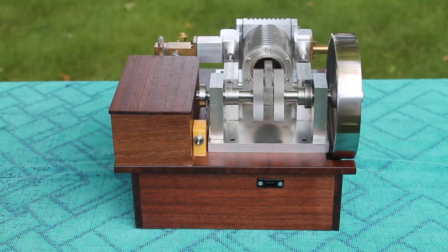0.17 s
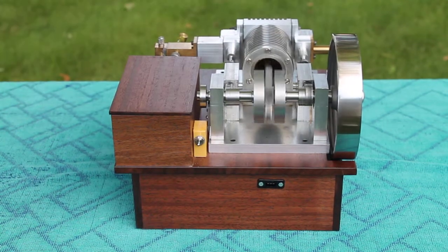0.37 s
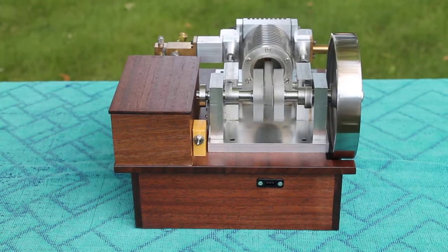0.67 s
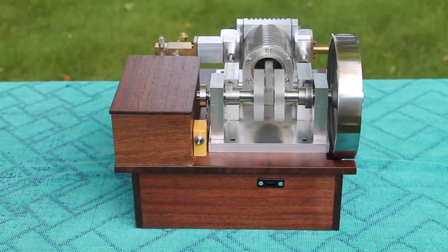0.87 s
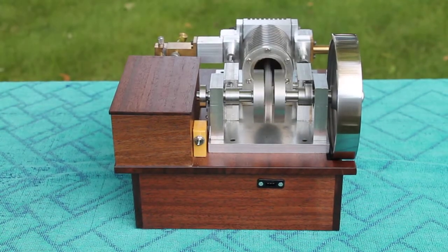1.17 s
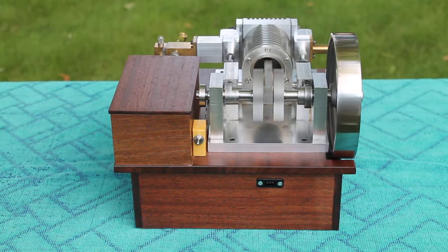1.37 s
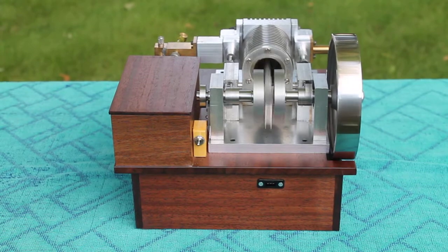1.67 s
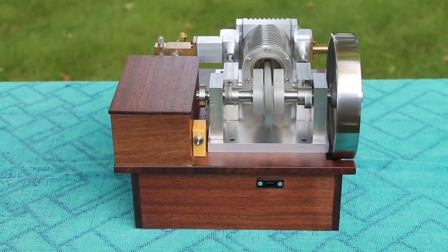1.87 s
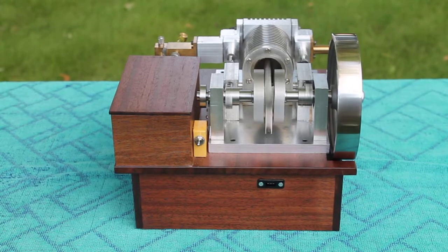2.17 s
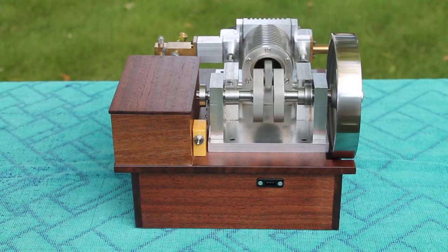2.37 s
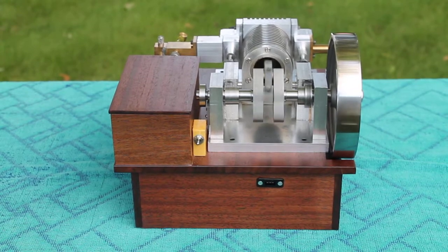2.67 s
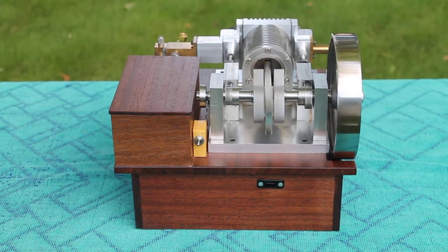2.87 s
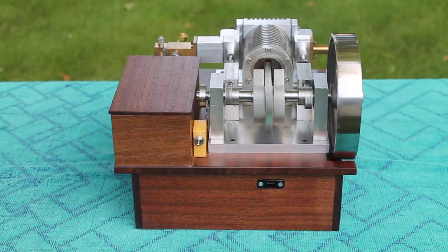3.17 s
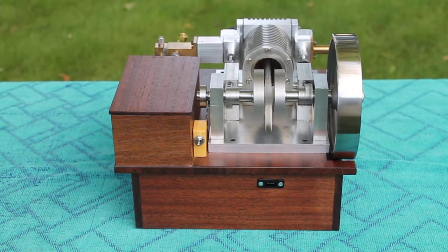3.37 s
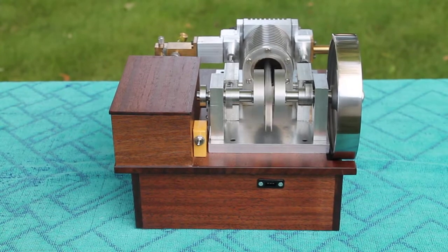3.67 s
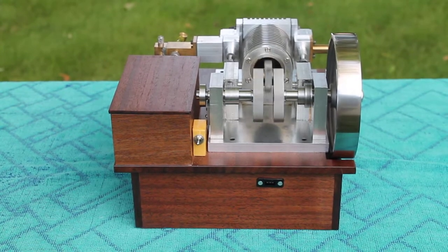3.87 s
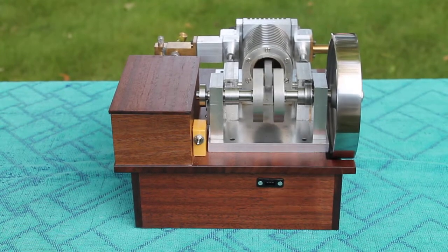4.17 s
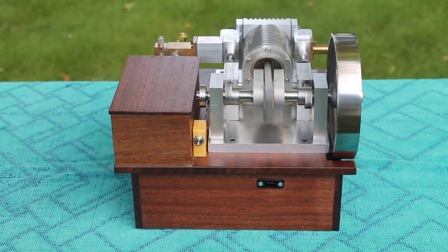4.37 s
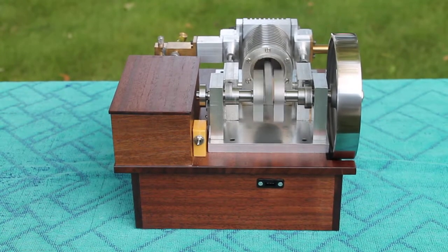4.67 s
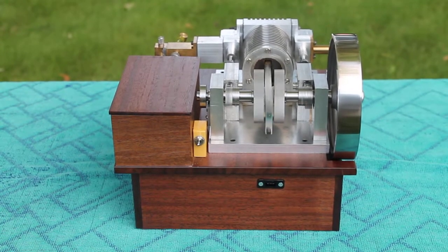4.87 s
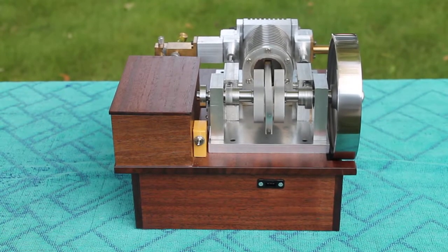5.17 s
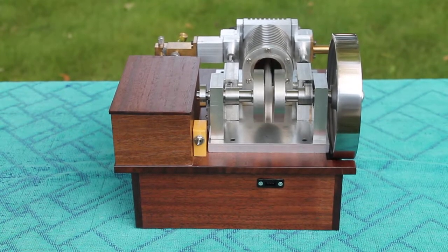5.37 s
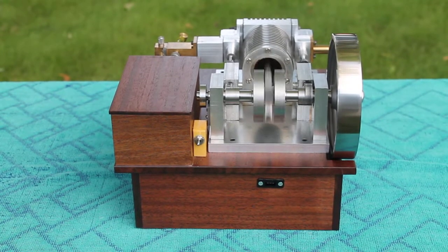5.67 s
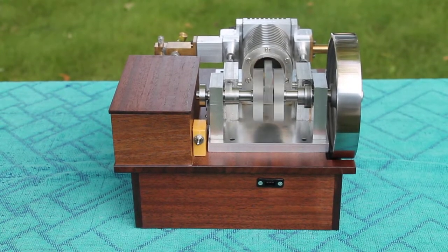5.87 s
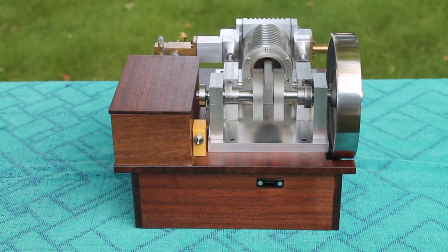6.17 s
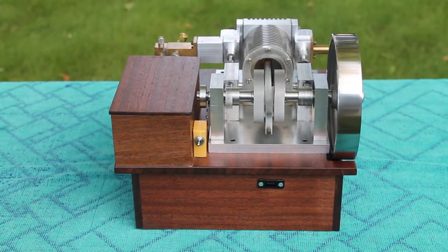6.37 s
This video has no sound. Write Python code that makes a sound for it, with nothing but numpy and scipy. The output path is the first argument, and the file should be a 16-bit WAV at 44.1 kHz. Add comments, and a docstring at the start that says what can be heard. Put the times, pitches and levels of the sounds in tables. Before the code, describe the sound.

Close, dry outdoor sound of a little metal engine on a wooden box. Each turn gives a sharp snappy exhaust pop, a short hollow hoot and puff of gas, then a bright metallic clack and a lighter tick. It catches unevenly at first, slightly faster and with one big hissing puff, then keeps a limping loud-soft rhythm to the end, over soft mechanical rubbing and faint still air.

```python
"""A small single-cylinder model gas engine barks through its exhaust outdoors, unevenly, about seven turns a second.
Each blast is a damped port resonance with noise bursts; the cylinder then hoots as a gliding sine while gas hisses out.
Valve gear, inlet and ignition add noise bursts and decaying modes; sliding parts rub as modulated noise.
A wall and the garden answer faintly by convolution with decaying noise, over a still-air noise floor."""
import sys
import numpy as np
from scipy import signal
from scipy.fft import rfft, irfft, next_fast_len
from scipy.io import wavfile

SR = 44100
rng = np.random.default_rng(int(sys.argv[2]) if len(sys.argv) > 2 else 0)


def output_pcm(signal):
    """Save a mono or channel-first signal as 16-bit PCM at the path in sys.argv[1].

    Samples are clipped to [-1, 1] before scaling.
    """
    pcm = np.clip(np.atleast_2d(signal).T, -1, 1) * 32767
    wavfile.write(sys.argv[1], SR, np.round(pcm).astype(np.int16))


N = 287973

# Exhaust openings, one a turn; once settled, hard and soft blasts alternate: start_s, cylinder_pressure_db
EXHAUST_OPENINGS = [(0.1115, -7), (0.2718, 8.5), (0.3847, 4), (0.5034, 6), (0.6224, -3.5), (0.7524, 7),
                    (0.8543, -0.5), (0.965, 7.5), (1.068, -1.5), (1.1848, -3), (1.319, -4), (1.452, -11),
                    (1.5515, -4), (1.6756, 7), (1.7925, -3), (1.9196, 5.5), (2.0485, 2), (2.1857, 4),
                    (2.3226, -1), (2.468, 3.5), (2.6166, 0), (2.764, 2), (2.9085, -3.5), (3.0619, 4.5),
                    (3.2119, -6), (3.3711, 2.5), (3.5217, -8), (3.6733, 4), (3.8185, -4.5), (3.9695, 2.5),
                    (4.1218, -1.5), (4.2803, 2.5), (4.4288, -5), (4.5847, 4), (4.7418, -3.5), (4.9022, 3.5),
                    (5.0508, -7), (5.2092, 1.5), (5.3593, 0), (5.51, 3.5), (5.6571, -4), (5.8078, 4.5),
                    (5.9536, -7), (6.1051, 5), (6.2478, -5.5), (6.396, -2.5)]
# What the cylinder pressure drives: pressure_db, bark_db, jet_db, hoot_db, outflow_db
PRESSURE_LAWS = [(-11, -45, -37, -27, -69), (-7.5, -24.5, -24, -34.5, -84), (-5.5, -21, -27, -30.5, -55.5),
                 (2.5, -16.5, -14.5, -28.5, -45), (5, -14.5, -15, -28.5, -39.5),
                 (7.5, -14.5, -13, -25.5, -31.5)]

# Noise spectra, relative density against frequency: frequency_hz, density_db (per Hz)
BARK_SPECTRUM = [(300, -7.5), (450, -3.5), (750, -5.5), (1150, -9.5), (1700, 2.5), (2200, -2), (2700, -6),
                 (3500, -5.5), (4000, -21)]
JET_SPECTRUM = [(4000, -4), (5000, 2.5), (6500, 1), (7800, 3.5), (9500, -0.5), (11000, -5), (12500, -3.5),
                (14500, -5), (16000, 0.5)]
# Heavy first gush of burnt gas: frequency_hz, density_db
CHUFF_SPECTRUM = [(120, -9), (350, -2.5), (1000, 8), (3000, -22), (16000, -50)]
# Hiss of the burnt gas flowing out: frequency_hz, density_db
OUTFLOW_SPECTRUM = [(100, -9.5), (400, 11.5), (600, -35), (1000, -18), (1800, -6), (2800, -9.5),
                    (4300, -9.5), (5600, -3), (8000, -5), (10500, -12.5), (13000, -12), (16000, -32)]
# Valve clack: frequency_hz, density_db
CLACK_SPECTRUM = [(150, -11), (450, -2.5), (700, -7), (1000, -1.5), (1500, 5), (2600, 7), (3700, 2),
                  (4600, 3.6), (5500, -6.5), (7000, -7.5), (8200, 2), (10500, -10), (14000, -29.5),
                  (16000, -51)]
# Inlet shutting: frequency_hz, density_db
TICK_SPECTRUM = [(120, -64), (350, 3), (650, -5), (1100, -16.5), (1700, -6.5), (3100, -7), (4000, -16.5),
                 (5500, -19.5), (7000, -14), (8400, -10.5), (10500, -23), (14000, -20.5), (16000, -33)]
# Gas drawn in: frequency_hz, density_db
DRAW_SPECTRUM = [(1500, 8), (2900, 0), (3900, -31), (4800, 12), (5800, -6.5), (7000, 10.5), (8000, -24),
                 (9300, 6.5), (13000, -0.5), (16000, 0.5)]
# Rubbing piston and bearings: frequency_hz, density_db
SLIDE_SPECTRUM = [(60, -71), (150, 12), (400, -12), (600, -9.5), (1100, 2), (1800, -1), (2900, 7.5),
                  (3800, -1), (4700, 0.5), (6000, -7.5), (8500, -16.5), (11000, -25), (16000, -56)]
# Still garden air: frequency_hz, density_db
AIR_SPECTRUM = [(60, -5), (150, 13.5), (3000, 0.5), (16000, -47)]

# Modes of the valve gear: frequency_hz, level_db, t60_s
GEAR_MODES = [(474, -12, 0.047), (1062, -9.5, 0.034), (1565, -5, 0.047), (2606, -4, 0.026),
              (3820, 2, 0.016), (4594, -1, 0.029), (8066, 11, 0.008)]
# Modes of the exhaust tappet: frequency_hz, level_db, t60_s
TAPPET_MODES = [(2480, 14.5, 0.0097), (2980, -8, 0.037), (12700, -51, 0.022), (14400, -17, 0.018)]
# Modes of the engine frame on its wooden box: frequency_hz, level_db, t60_s
FRAME_MODES = [(511, -1.5, 0.043), (653, 0.5, 0.045), (995, 4, 0.036), (1520, -3.5, 0.038),
               (1817, 2, 0.026), (3080, 3, 0.015)]

# Air resonance of the cylinder as the piston rises: stroke_share (0 to 1), pitch_hz, level_db
HOOT_GLIDE = [(0, 176, 2), (.12, 200, 2.5), (.24, 232, -2), (.34, 278, -9.5), (.52, 365, -25),
              (1, 420, -40)]
# Slow swelling and fading of the hoot: time_s, level_db
HOOT_SWELL = [(0.1, 0.5), (0.75, 2), (1.2, -2), (2.0, 1), (2.7, 2), (3.2, -0.4), (6.4, -0.6)]
# Bark pitch of a hard blast: time_s, pitch_hz
HARD_BARK_PITCH = [(0.4, 1770), (2.0, 1784), (3.2, 1623), (5.2, 1703), (5.8, 1680)]
# Rubbing level before stroke, grain and trim: time_s, level_db
SLIDING_LEVEL = [(0.0, -44), (0.44, -43.5), (3.47, -47), (6.53, -48.5)]
# Reverberation time of the garden: frequency_hz, t60_s
GARDEN_DECAY = [(200, 0.15), (4000, 0.38), (15000, 0.69)]
# Flywheel lurches while the engine catches: turn_start_s, clack_delay_s (negative is early)
FLYWHEEL_LURCHES = [(0.11, 0.0046), (0.62, 0.0046), (1.32, 0.0098), (1.45, -0.0057)]
# Strength of combustion, harder in the first charges: time_s, level_db
FLAME_LEVEL = [(1.66, -23), (1.89, -28)]
# Charges that do not light: time_s
MISFIRE_TIMES = [0.08, 0.6, 0.83, 1.05, 1.16, 1.29, 1.53, 1.77, 2.02]
# Charges that light late: time_s
LATE_FLAME_TIMES = [0.36, 1.65, 3.94]

TOP_HZ = 16050  # band limit
LEAD = 1024  # samples before each event's time zero
T = (np.arange(8 * LEAD) - LEAD) / SR  # time around one event (s)
AFTER = np.maximum(T, 0)
TURN_S = 0.148  # usual turn
# return stroke in a usual turn, its power law against the turn, and the time each dB of pressure saves
RETURN_S, RETURN_POWER, PUSH_S_PER_DB = 0.0734, 1.06, 0.00007
# the inlet stays open for a lag plus a share of the return stroke
INLET_LAG_S, INLET_SHARE = 0.0022, 0.39
# from the inlet shutting to ignition, the extra wait of a slow charge, and the spread in strength
FLAME_DELAY_S, LATE_DELAY_S, FLAME_SCATTER_DB = 0.0103, 0.0063, 1.1
# one late charge burns on into the open exhaust and swells its outflow
AFTERBURN_S, AFTERBURN_DB = 1.45, 31
# a soft blast barks higher: its pitch, the pressure where this changes, and the width of the change
SOFT_BARK_HZ, BARK_SWITCH_DB, BARK_BLEND_DB = 2720, -1.5, 3


def amp(db):
    """Decibel law: level to amplitude ratio."""
    return 10 ** (np.asarray(db) / 20)


def along(points, hz):
    """Linear interpolation of (frequency_hz, value) points on a logarithmic frequency axis."""
    f, value = np.transpose(points)
    return np.interp(np.log(hz + 1), np.log(f + 1), value)


def columns(rows):
    """Table columns set upright, one row per event, to broadcast against event time."""
    return np.transpose(rows)[:, :, None]


def filtered(x, response):
    """Linear filtering: multiplication by a frequency response."""
    size = x.shape[-1]
    padded = next_fast_len(size + LEAD)
    spectrum = rfft(x, padded) * response(np.fft.rfftfreq(padded, 1 / SR))
    return irfft(spectrum, padded)[..., :size]


def noise(spectrum, shape):
    """Spectral shaping of white noise to rms 1, with a roll-off below the lowest listed frequency."""
    def response(f):
        skirt = 1 / (1 + (spectrum[0][0] / 2 / (f + 1)) ** 4)
        return amp(along(spectrum, f)) * skirt

    x = filtered(rng.standard_normal(shape), response)
    return x / x.std()


def sized(x):
    """Energy normalization: each burst gets the energy of rms 1 held for 6 ms."""
    energy = np.sum(x ** 2, axis=-1, keepdims=True)
    return x / np.sqrt(energy / (.006 * SR) + 1e-20)


def burst(spectrum, count, onset, rise, decay):
    """Transient turbulence: noise breaks out near -onset, swells to time zero and dies away (all s)."""
    start = onset * np.exp(0.274 * rng.standard_normal((count, 1)))
    attack = np.clip((T + start) / 0.00022, 0, 1)
    envelope = attack * np.exp(np.minimum(T, 0) / rise - AFTER / decay)
    return sized(noise(spectrum, (count, len(T))) * envelope)


def ringing(modes, count):
    """Modal superposition: each blow excites every damped mode at a new strength and phase."""
    out = 0
    for hz, db, t60 in modes:
        strength, phase = rng.standard_normal((2, count, 1))
        decay = amp(db + 1.06 * strength - 60 * AFTER / t60)
        out = out + decay * np.sin(2 * np.pi * (hz * T + phase))
    return sized(out * (1 - np.exp(-AFTER / 0.00014)))


def placed(times, sounds):
    """Linear superposition of event sounds on the time line."""
    at = np.round(times * SR).astype(int) + np.arange(len(T))
    return np.bincount(np.maximum(at, 0).ravel(), sounds.ravel(), N + LEAD)[LEAD:LEAD + N]


def near(times, moments):
    """Coincidence test: which times lie within 45 ms of one of the moments."""
    return np.any(abs(times - np.atleast_1d(moments)) < .045, axis=1, keepdims=True)


def intake_times():
    """Crank kinematics: the inlet opens about half a turn after each exhaust and then shuts: (opens s, shuts s)."""
    s, pressure_db = columns(EXHAUST_OPENINGS)
    start = np.vstack([s[0] - TURN_S, s])
    turn = np.vstack([s, s[-1] + TURN_S]) - start
    stroke = RETURN_S * (turn / TURN_S) ** RETURN_POWER
    stroke = stroke - PUSH_S_PER_DB * np.vstack([0, pressure_db])
    stroke = stroke + sum(delay * near(start, at) for at, delay in FLYWHEEL_LURCHES)
    opens = start + stroke
    return opens, opens + INLET_LAG_S + INLET_SHARE * stroke


def pace_db():
    """Stroke speed as a level: each intake's quickness relative to the median, in dB."""
    s, shut = intake_times()
    return 20 * np.log10(np.median(shut - s) / (shut - s))


def flames():
    """Ignition delay: charges that do not misfire light after the inlet shuts, a few late: (s, dB)."""
    s = intake_times()[1] + FLAME_DELAY_S
    s = s[~near(s, MISFIRE_TIMES)][:, None]
    s = s + LATE_DELAY_S * near(s, LATE_FLAME_TIMES)
    level_db = np.interp(s, *np.transpose(FLAME_LEVEL))
    return s, level_db + FLAME_SCATTER_DB * rng.standard_normal(s.shape)


def exhausts():
    """Blowdown: pressure sets each exhaust's sound: (s, bark dB, jet dB, bark Hz, hoot dB, outflow dB)."""
    s, pressure_db = columns(EXHAUST_OPENINGS)
    steps, *laws = np.transpose(PRESSURE_LAWS)
    bark_db, jet_db, hoot_db, flow_db = [np.interp(pressure_db, steps, law) for law in laws]
    hard = np.clip(.5 + (pressure_db - BARK_SWITCH_DB) / BARK_BLEND_DB, 0, 1)
    hard_hz = np.interp(s, *np.transpose(HARD_BARK_PITCH))
    bark_hz = SOFT_BARK_HZ + hard * (hard_hz - SOFT_BARK_HZ)
    bark_hz = bark_hz * (1 + 0.032 * rng.standard_normal(s.shape))
    hoot_db = hoot_db + np.interp(s, *np.transpose(HOOT_SWELL))
    flow_db = flow_db + AFTERBURN_DB * near(s, AFTERBURN_S)
    return s, bark_db, jet_db, bark_hz, hoot_db, flow_db


def air(level_db=-48):
    """Ambient noise: the garden air is a steady random signal of fixed spectrum."""
    return amp(level_db) * noise(AIR_SPECTRUM, N)


def garden(x, wall_db=-22, tail_db=-22):
    """Reflection and scattering: convolution with a smeared wall slap and a thin tail from plants and ground."""
    hz, t, z = signal.stft(rng.standard_normal(SR // 3), SR, nperseg=256)
    decay = amp(-60 * t / along(GARDEN_DECAY, hz)[:, None])
    tail = signal.istft(z * decay, SR, nperseg=256)[1]
    late = np.arange(len(tail)) / SR - .0215  # time after the wall's echo arrives
    wall = noise([(100, 7.5), (1800, -3.5), (3500, -9), (16000, -2.5)], len(tail))
    wall = wall * (late > 0) * np.exp(-abs(late) / 0.0028)
    answer = amp(tail_db) * tail / np.linalg.norm(tail) + amp(wall_db) * wall / np.linalg.norm(wall)
    return signal.fftconvolve(x, answer)[:N]


def sliding(slide_db=-1.5, depth_db=4, grain_db=4.5):
    """Sliding friction: piston and bearings rub with a fine grain, loudest in mid-stroke."""
    t = np.arange(N) / SR
    # stroke ends: the exhaust opens at one, the intake at the other
    ends = np.sort(np.r_[intake_times()[0].ravel(), np.transpose(EXHAUST_OPENINGS)[0]])
    strokes = np.interp(t, ends, np.arange(len(ends)))
    grain = grain_db * noise([(40, 11), (400, -11), (1200, -37)], N)
    level = np.interp(t, *np.transpose(SLIDING_LEVEL)) + grain
    level = level + slide_db - depth_db * np.cos(2 * np.pi * strokes)
    return amp(level) * noise(SLIDE_SPECTRUM, N)


def intake(draw_db=-40, tick_db=-26.0, frame_db=-31):
    """Flow noise and impact: gas hisses in until the inlet ticks shut on the frame, harder on a quick stroke."""
    s, shut = intake_times()
    count, length = len(s), shut - s
    flow = np.clip(2 * T / length, 0, 1) * np.clip((length - T) / 0.0048, 0, 1)
    draw = amp(draw_db + 2.1 * pace_db()) * flow * noise(DRAW_SPECTRUM, flow.shape)
    tick = amp(tick_db) * burst(TICK_SPECTRUM, count, onset=0.0017, rise=0.00064, decay=0.0025)
    tick = tick + amp(frame_db) * ringing(FRAME_MODES, count)
    return placed(s, draw) + placed(shut - .0003, amp(1.44 * pace_db()) * tick)


def valve_gear(clack_db=-22, ring_db=-26.5, snap_db=-29, lift_db=-40, tappet_db=-30):
    """Impact excitation: the cam touches its follower, then throws the valve; a tappet clicks before each exhaust."""
    s, _ = intake_times()
    count, force = len(s), amp(pace_db())
    clack = burst(CLACK_SPECTRUM, count, onset=0.00284, rise=0.0061, decay=0.0036)
    out = placed(s, amp(clack_db) * force * clack)
    # the loose linkage makes two hard contacts, each with a snap and a ring
    for offset in (-.002, .0002):
        at = s + offset + .0004 * rng.standard_normal(s.shape)
        snap = burst(JET_SPECTRUM, count, onset=0.00029, rise=.001, decay=0.000088)
        contact = amp(snap_db) * snap + amp(ring_db) * ringing(GEAR_MODES, count)
        out = out + placed(at, force * contact)
    touch = s - .0095 + 0.0013 * rng.standard_normal(s.shape)
    lift = placed(touch, amp(lift_db) * ringing(GEAR_MODES, count))
    opens = columns(EXHAUST_OPENINGS)[0]
    early = 0.0037 + 0.001173 * rng.standard_normal(opens.shape)
    tappet = placed(opens - early, amp(tappet_db) * ringing(TAPPET_MODES, len(opens)))
    return out + lift + tappet


def ignition(start_hz=1900, end_hz=330, fall_s=0.00397, chirp_db=-8, shaken_db=-1, knock_db=-3):
    """Swept resonance: the flame rings the chamber; its note falls as the piston yields and wakes frame modes."""
    s, db = flames()
    count = len(s)
    glide = np.exp(-AFTER / (fall_s * np.exp(0.204 * rng.standard_normal(s.shape))))
    turns = np.cumsum(end_hz + (start_hz - end_hz) * glide, axis=1) / SR
    envelope = (1 - np.exp(-AFTER / 0.00023)) * np.exp(-AFTER / 0.01)
    chirp = sized(np.sin(2 * np.pi * turns) * envelope)
    frame = ringing(FRAME_MODES, count)[:, LEAD:]
    shaken = sized(signal.fftconvolve(chirp, frame, axes=1)[:, :len(T)])
    knock = sized(ringing(FRAME_MODES, count) * np.exp(-AFTER / 0.004))
    mix = amp(chirp_db) * chirp + amp(shaken_db) * shaken + amp(knock_db) * knock
    return placed(s, amp(db) * mix)


def emptying(hoot_db=4.0, radiates_hz=125, hiss_db=2, hiss_decay_s=0.082, sustain_db=-12, chuff_db=1,
             ripple_db=5.5):
    """Cavity resonance: the rising piston shrinks the open cylinder, so its hoot climbs as gas gushes and hisses."""
    s, _, _, _, ring_db, flow_db = exhausts()
    stroke = intake_times()[0][1:] - s
    share, hz, db = np.transpose(HOOT_GLIDE)
    travel = AFTER / stroke
    pitch = np.interp(travel, share, hz) * (1 + 0.0054 * rng.standard_normal(s.shape))
    turns = np.cumsum(pitch * (T > 0), axis=1) / SR
    wave = np.sin(2 * np.pi * turns)
    port_open = (1 - np.exp(-AFTER / 0.0017)) * np.clip((1 - travel) * 10 + 1, 0, 1)
    # a strong outflow keeps the resonance blowing to the end of the stroke
    strength = amp(ring_db + hoot_db + np.interp(travel, share, db)) + amp(flow_db + sustain_db)
    # the small port radiates little at the lowest frequencies
    hoot = filtered(strength * wave * port_open, lambda f: 1 / (1 + (radiates_hz / (f + 1)) ** 6))
    # the jet sizzles in a new colour on every stroke
    shift = rng.random(s.shape)
    sizzle = filtered(noise(OUTFLOW_SPECTRUM, travel.shape),
                      lambda f: amp(ripple_db * np.sin(2 * np.pi * (f / 3000 + shift))))
    hiss = amp(flow_db + hiss_db) * sizzle * np.exp(-AFTER / hiss_decay_s)
    chuff = amp(flow_db + chuff_db) * noise(CHUFF_SPECTRUM, travel.shape) * np.exp(-AFTER / 0.03)
    return placed(s - .0005, hoot + (hiss + chuff) * port_open)


def shock(crack_db=-7, crack_s=0.00049, push_db=0, push_s=0.00057):
    """Pressure front: a sharp noise crack, and a low two-sided pulse that grows with the outflow."""
    s, _, jet_db, _, _, flow_db = exhausts()
    crack = burst(JET_SPECTRUM, len(s), onset=0.00033, rise=0.001, decay=crack_s)
    crack = amp(jet_db + crack_db) * crack
    u = AFTER / push_s
    pulse = (T > 0) * (1 - u) * np.exp(-u) * (1 - np.exp(-AFTER / 0.0001))
    push = amp(flow_db + push_db) * sized(pulse)
    crack_at = s - 0.0004 + 0.0005 * rng.standard_normal(s.shape)
    return placed(crack_at, crack) + placed(s - 0.001, push)


def blast(tone_db=-5.5, burst_db=-2, jet_trim_db=-0.37):
    """Damped port resonance and jet turbulence: the port cracks open with a brief bark, then a sharp jet."""
    s, bark_db, jet_db, hz, _, _ = exhausts()
    count = len(s)
    # the port's own resonance starts at once and is damped within a few milliseconds
    since = np.maximum(T + 0.00163, 0)
    tone = sized(np.sin(2 * np.pi * hz * since) * since * np.exp(-since / 0.0012))
    rush = burst(BARK_SPECTRUM, count, onset=0.00137, rise=0.0064, decay=0.003)
    bark = amp(tone_db) * tone + amp(burst_db) * rush
    jet = burst(JET_SPECTRUM, count, onset=0.00385, rise=0.0022, decay=0.0021)
    return placed(s - .0004, amp(bark_db) * bark) + placed(s + .0003, amp(jet_db + jet_trim_db) * jet)


def scene():
    """Superposition of the engine close by, its reflections and the still air."""
    engine = sliding() + intake() + valve_gear() + ignition() + emptying() + shock() + blast()
    return (air() + garden(engine) + engine)[None]


def record(dry, ceiling=0.85, low_cut_hz=42):
    """Soft saturation rounds the highest peaks; a first-order high-pass and a band limit follow."""
    rounded = dry / (1 + (dry / ceiling) ** 4) ** (1 / 4)

    def response(hz):
        high_pass = 1j * hz / (low_cut_hz + 1j * hz)
        return high_pass * np.clip((TOP_HZ - hz) / 400 + .5, 0, 1)

    return filtered(rounded, response)


dry = scene()
out = record(dry)
output_pcm(out)
```